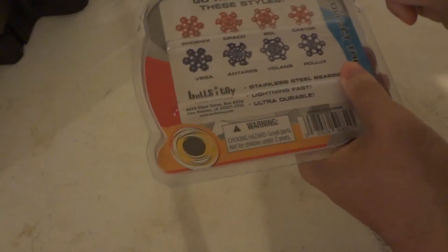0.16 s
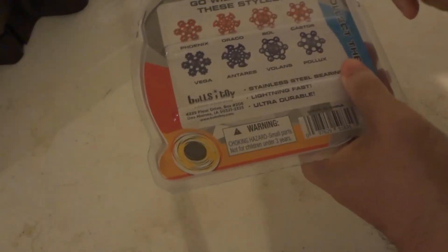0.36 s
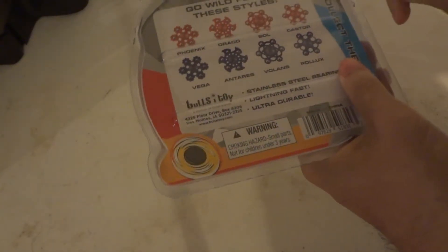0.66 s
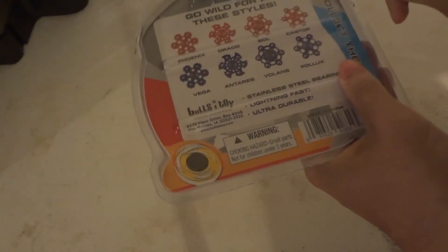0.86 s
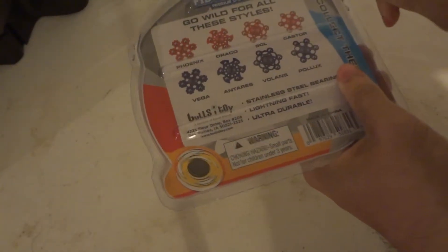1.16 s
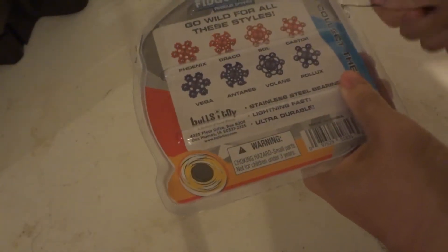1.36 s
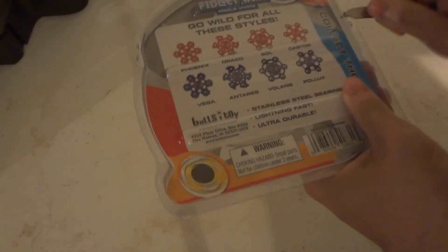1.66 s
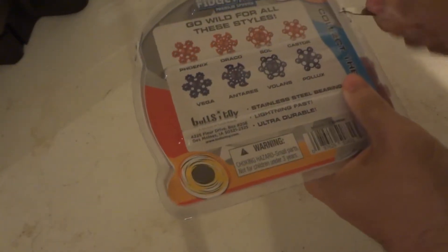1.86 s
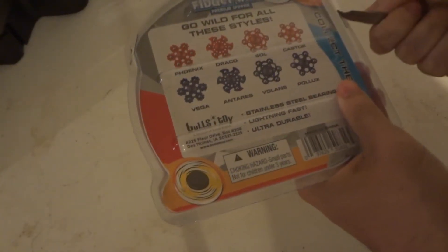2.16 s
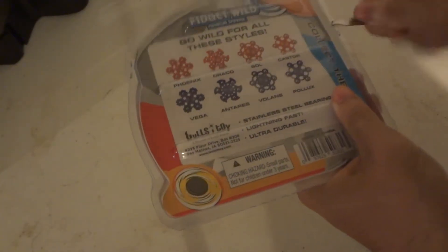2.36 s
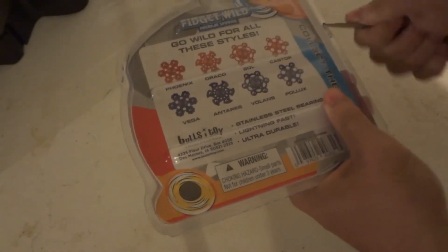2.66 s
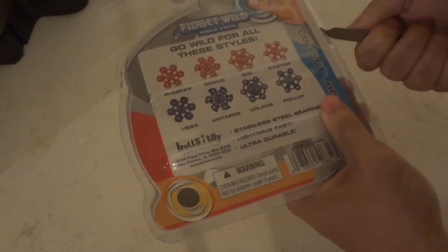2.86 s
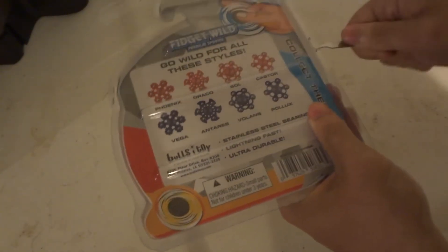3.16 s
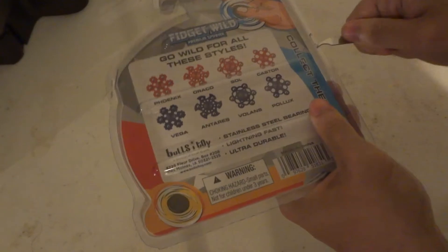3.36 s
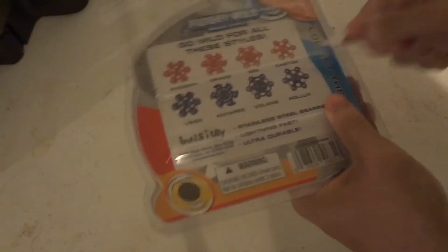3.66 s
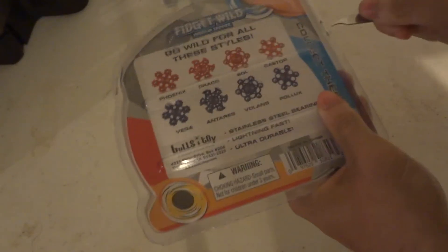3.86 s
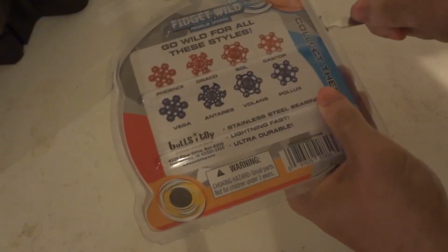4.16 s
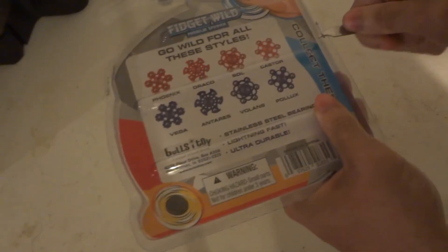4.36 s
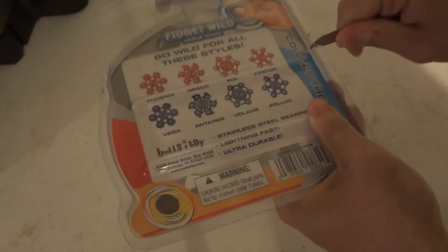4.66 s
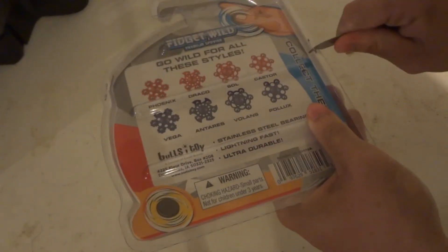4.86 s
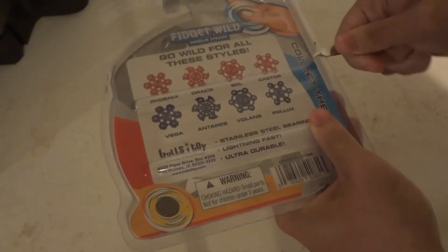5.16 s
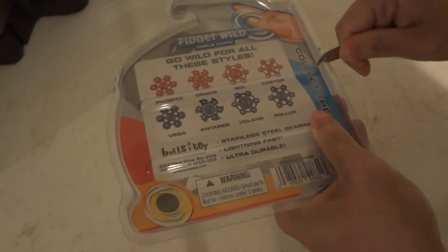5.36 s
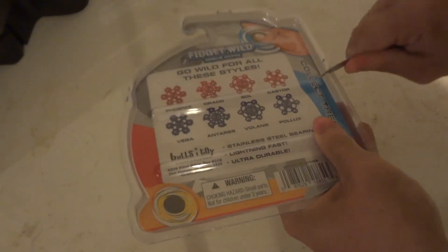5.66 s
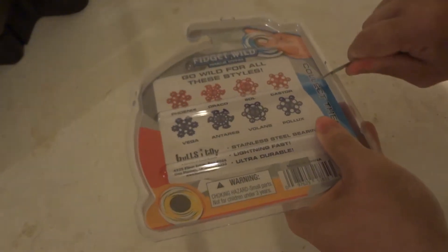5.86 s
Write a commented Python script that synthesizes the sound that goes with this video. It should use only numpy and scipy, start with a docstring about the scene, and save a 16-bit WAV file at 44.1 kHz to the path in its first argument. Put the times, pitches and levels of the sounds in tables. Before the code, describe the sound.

Close up in a quiet, hissy room, a small metal tip slips and ticks faintly against a plastic and card pack. A hard pry crackles and ends in the loudest snap at about 1.6 seconds. More snaps come in groups until 3.6, then softer clicks, a firm crack near 4.9 and a last bright snap just before the end.

```python
"""A small metal tool pries staples out of a plastic blister pack held close to a stereo microphone.
Faint slips of the tip come first; hard pries crackle near 1.6 s, and the loudest snap follows at 1.64 s.
More snaps come in groups up to 3.6 s, softer ones after 3.9 s, firm ones at 4.95 s and a last one at 5.9 s.
Slips are clicks and pries dense grains, both ringing the modes of card, plastic and metal.
Throughout, a quiet room hums and hisses as filtered noise, and the top of the hiss swells in patches."""
import sys
import numpy as np
from scipy import signal
from scipy.fft import rfft, irfft, next_fast_len
from scipy.io import wavfile

SR = 44100
rng = np.random.default_rng(int(sys.argv[2]) if len(sys.argv) > 2 else 0)


def bounce(signal):
    """Save signal as a 16-bit WAV file at the path given by the first command-line argument."""
    frames = np.transpose(np.atleast_2d(signal))
    limited = np.clip(frames, -1, 1)
    pcm = np.round(limited * 32767).astype(np.int16)
    wavfile.write(sys.argv[1], SR, pcm)


N = 265480

# Slips of the tip. Each row: start in seconds, shell push in dB, hollow and staple pushes in dB against
# the shell, drag time in milliseconds, pitch of the spot struck in Hz.
SLIPS = [(.1525, -62.5, 12, 13, 1.05, 1550), (0.1925, -54, 0, 6.5, 0.78, 1270),
         (0.3912, -59, 2, 11, 0.94, 1290), (.8, -57, 5, 4, 1.4, 5400), (1.059, -56.5, 9, 7, 1.1, 2260),
         (1.115, -52, 3.5, 9.5, 1.98, 1090), (1.18, -65.5, 3, 13, 1, 6170), (1.19, -51, 5.5, 10, 2.1, 1140),
         (1.2258, -59.5, -5, 9, 3.1, 4180), (1.2519, -62, 9, 7.5, 3.6, 7050),
         (1.283, -66.5, -3, 14, 1.9, 5970), (1.343, -71, -3, 13, 2.5, 5500),
         (1.4062, -62, 11, 10.5, 2.5, 4960), (1.4397, -64, 5, 12, 0.98, 5030),
         (1.469, -50.5, 1, 7.5, 1.55, 1230), (1.531, -55, -18, 7.5, .6, 3230),
         (1.571, -49.5, -3, 5, 7.7, 1380), (1.6003, -43, 1, 11.5, 6.9, 2230),
         (1.617, -37.5, -0.5, 1, 5.0, 1420), (1.6244, -31, 1, 3, 2.53, 2100),
         (1.641, -23, 6.5, 6.5, 0.77, 2544), (1.9948, -53.5, -6.5, 0, 5.2, 1260),
         (2.021, -59, -6.5, 7, 3.8, 2160), (2.048, -56.5, -2, 7, 4.4, 2800),
         (2.0903, -58, -11.5, 12.5, 1.1, 3350), (2.2776, -46.5, 0, 0, 1.36, 1400),
         (2.2997, -48.5, 2, 7, 8.8, 1340), (2.3159, -44.5, 8, 6, 2.9, 1430),
         (2.3347, -26, 0.5, 7, 1.28, 1280), (2.4256, -43, 7, 11, 2.5, 2630),
         (2.5585, -51, 15, 5, 1.14, 1423), (2.578, -56, -7, 7, 2.8, 2090),
         (2.616, -58.5, -5, -2, 2.2, 2580), (2.7022, -51, -3, 5, 1.6, 1180),
         (2.756, -67, 17, 4, 0.89, 1600), (2.7987, -33.5, 10, 6.5, 0.59, 1390),
         (2.8055, -37.5, -6, -8, 3.06, 2450), (3.0, -64, -6.5, 15.5, .9, 6060),
         (3.0386, -35.5, -1, 16, 0.96, 5150), (3.0408, -27, 0.5, 3.5, 3.52, 4450),
         (3.115, -37, 0, 1, 4.0, 4790), (3.3273, -61.5, 11, -5, 8.1, 960), (3.4917, -35, 5, 4, 2.24, 1280),
         (3.5003, -25.5, -1, 3, 1.27, 1270), (3.512, -34.5, 8, 13.5, 3.5, 3020),
         (3.5229, -37, 0, 10.5, 1.2, 1290), (3.5765, -38, -12, 9, 4.5, 3200),
         (3.5852, -31.5, 9, 7.5, 0.77, 1490), (3.597, -41, 14, -11, 3.3, 1010),
         (3.644, -42.5, 1.5, -6, 5.0, 1200), (3.9241, -53, 12.5, 10, 3.06, 1224),
         (4.182, -55.5, 0, -4, 6.4, 1600), (4.2224, -58, 13.5, 10.5, 1.52, 1300),
         (4.2365, -61.5, 8.5, 12, 3.6, 1280), (4.2851, -50.5, 8.5, 14, 0.7, 1330),
         (4.3039, -56, 13, 11, 3.65, 1290), (4.314, -43.5, 2.5, 6.5, 2.1, 1260),
         (4.4323, -42.5, 9.5, 14, 1.42, 1310), (4.9426, -45, 1, 13, 0.49, 4930),
         (4.9467, -30.5, 7.5, 12.5, 2.12, 2080), (4.965, -32.5, 6, -1, 2.43, 2080),
         (5.016, -50.5, 2, 8, 3.0, 1230), (5.0834, -41.5, 4.5, 7.5, 1.45, 1280),
         (5.229, -34.5, 3.5, 6.5, 2.19, 2890), (5.258, -39.5, 8, -16, 0.51, 2850),
         (5.309, -59, -3, 2, 2.5, 2200), (5.4136, -66.5, 5.5, 19.5, 0.51, 5400),
         (5.925, -30, 3, 8, 1.46, 4900)]
# Resonances of card, hollow blister, plastic shell, staple and tool.
# Each row: frequency in Hz, bandwidth in Hz, relative level in dB.
CARD_MODES = [(321, 170, -9), (388, 31, -6.5), (442.4, 48, -3), (576, 114, -3.5)]
HOLLOW_MODES = [(988, 154, -16.5), (1230, 400, -7), (1288, 186, 0.5), (1488, 336, -2), (1768, 330, 0)]
SHELL_MODES = [(1847, 170, -5), (2250, 144, -0.5), (2750, 322, 5), (3034, 77, -7), (3390, 210, -2)]
STAPLE_MODES = [(3993, 515, 0.5), (4840, 570, -1.4), (5490, 900, 2.2), (5940, 810, 0)]
TOOL_MODES = [(6720, 530, -0.5), (8020, 1380, 5.3), (8800, 390, -2), (10470, 1210, 4.5)]
SLIP_CARD_DB = -17.5   # card thump of a slip, against the shell
# tool edge against the staple: stronger on stiff, high spots
TOOL_DB, TOOL_DB_PER_OCTAVE, MID_SPOT_HZ = -4.5, 5, 2570
CHATTER_CLICKS = 30   # per slip


def slips():
    """Stick-slip excitation: a click and a fading chatter, which takes more of the energy in a longer drag."""
    start_s, shell_db, hollow_db, staple_db, drag_ms, spot_hz = np.transpose(SLIPS)
    tool_db = staple_db + TOOL_DB + TOOL_DB_PER_OCTAVE * np.log2(spot_hz / MID_SPOT_HZ)
    at = (start_s * SR).astype(int)
    drag_s = drag_ms[:, None] / 1000

    # exponential waits make the chatter thin out after the click
    wait_s = 1.3 * drag_s * rng.exponential(1, (len(at), CHATTER_CLICKS))
    later = np.minimum(at[:, None] + (wait_s * SR).astype(int), N - 1)
    chatter_share = np.clip(0.07 + (drag_s / 0.0048) ** 2, 0, .97)   # of the energy
    chatter_height = np.sqrt(chatter_share / CHATTER_CLICKS)
    click_height = np.sqrt(1 - chatter_share[:, 0])
    direction = rng.choice([-1, 1], len(at))   # the shell is pushed in or springs out

    def strike(part_db, mode_hz):
        # modes near the pitch of the spot that was struck get the larger push
        octaves_off = np.log2(mode_hz / spot_hz)
        near_db = 10.46 * np.exp(-(octaves_off / 0.2) ** 2)
        uneven_db = rng.normal(0, 1.63, len(at))
        size = amp(shell_db + part_db + near_db + uneven_db)
        clicks = np.zeros(N)
        np.add.at(clicks, later, chatter_height * rng.normal(0, 1, later.shape) * size[:, None])
        clicks[at] += size * click_height * direction
        return clicks

    card = body(lambda hz: strike(SLIP_CARD_DB, hz), CARD_MODES)
    hollow = body(lambda hz: strike(hollow_db, hz), HOLLOW_MODES)
    shell = body(lambda hz: strike(0, hz), SHELL_MODES)
    staple = body(lambda hz: strike(staple_db, hz), STAPLE_MODES)
    tool = body(lambda hz: strike(tool_db, hz), TOOL_MODES)
    return card + hollow + shell + staple + tool


# Hard pries that make the plastic crackle. Each row: peak in seconds, drive in dB, rise in milliseconds,
# hold in milliseconds, hollow and metal drives in dB against the shell.
PRIES = [(0.805, -74.5, 24, 4.5, -2, 5.5), (1.627, -61.5, 29, 17, 8.5, 9), (2.335, -56, 1.7, 1.5, -16, -5),
         (2.431, -67.5, 1.4, 1.5, -1, -13), (2.801, -65.5, 1.2, 1.5, 0, 1),
         (3.038, -59.5, 2.2, 120, -1, 6.5), (3.497, -63, 18, 27, 6.5, 2), (3.586, -63.5, 130, 1.4, 5, -3.5),
         (3.645, -69.5, 39, 4, 6, 8), (4.19, -84.5, 55, 4.6, -6, 8), (4.947, -61.5, 4, 20, 4.5, 5.5),
         (5.233, -69.5, 1.5, 1.5, 1, -1), (5.259, -74.5, 8, 1.5, 2.5, -0.5),
         (5.924, -64.5, 1.6, 55, -2.5, 6.5)]
# Flexes of the card in the hand. Each row: peak in seconds, drive in dB, rise and hold in milliseconds.
FLEXES = [(1.603, -64, 7.5, 8.8), (1.624, -54.5, 9.1, 12), (2.445, -72.5, 19, 38), (2.799, -63.5, 1.7, 2.8),
          (3.043, -69.5, 1.5, 70), (3.33, -79, 7.1, 5.4), (3.501, -60.5, 9.9, 41), (3.56, -61.5, 25, 19),
          (4.183, -72, 33, 5.9), (4.224, -74, 8, 28), (4.308, -65, 18, 5.1), (4.432, -65.5, 1.7, 2.7),
          (4.946, -58, 3.4, 21), (5.083, -72, 1.7, 2.5), (5.23, -66.5, 1.5, 3.7)]


def crackle(per_s):
    """Crackling noise: random micro-slips under strain or bending drive the same resonant bodies."""
    shell, hollow, metal = sum(effort(*row[:4]) * amp([[0], [row[4]], [row[5]]]) for row in PRIES)
    card = sum(effort(*row) for row in FLEXES)
    happens = rng.random(N) < per_s / SR
    grain_db = 3.6 * np.minimum(rng.exponential(1, N), 4)
    grains = rms_one(happens * amp(grain_db))

    def strike(gain):
        return gain * grains * rng.standard_normal(N)

    card_sound = body(lambda hz: strike(card), CARD_MODES)
    hollow_sound = body(lambda hz: strike(hollow), HOLLOW_MODES)
    shell_sound = body(lambda hz: strike(shell), SHELL_MODES)
    metal_sound = body(lambda hz: strike(metal), STAPLE_MODES + TOOL_MODES)
    return card_sound + hollow_sound + shell_sound + metal_sound


RISE_DB, SAG_DB_PER_S, RELEASE_DB_PER_S = 32, 160, 796   # shape of every pry and flex


def effort(peak_s, db, rise_ms, hold_ms):
    """Loading and release: gain rises to its peak, sags while the force holds, then lets go fast."""
    t = np.arange(N) / SR - peak_s
    hold_s = hold_ms / 1000
    rising = RISE_DB * t / (rise_ms / 1000)
    sag = SAG_DB_PER_S * np.minimum(t, hold_s)
    release = RELEASE_DB_PER_S * np.maximum(t - hold_s, 0)
    shape_db = np.where(t < 0, rising, -sag - release)
    return amp(db + np.maximum(shape_db, -200))


def body(strike, modes):
    """Modal superposition: alternating signs, a push for each mode, little radiated outside them."""
    rung = np.zeros(N)
    for k, (hz, width_hz, db) in enumerate(modes):
        rung += (-1) ** k * amp(db) * resonate(strike(hz), hz, width_hz)
    edges_hz = [0.76 * modes[0][0], 1.76 * modes[-1][0]]
    return signal.sosfilt(signal.butter(3, edges_hz, "band", fs=SR, output="sos"), rung)


def resonate(x, hz, width_hz):
    """Damped two-pole resonance: a unit click sets a decaying sine of height about 1 ringing."""
    r = np.exp(-np.pi * width_hz / SR)
    w = 2 * np.pi * hz / SR
    return signal.lfilter([0, np.sin(w)], [1, -2 * r * np.cos(w), r * r], x + 1e-18)


BOUNCE_MS, BOUNCE_DB = 8.0, -16.5


def first_bounce(x):
    """Specular reflection: one delayed, weaker copy off a hard surface close by."""
    lag = int(BOUNCE_MS / 1000 * SR)
    return amp(BOUNCE_DB) * np.pad(x, (lag, 0))[:N]


ECHO_T60_S, ECHO_DB = 0.18, -21.5


def echoes(x):
    """Recirculating reflections: eight feedback delays a side from the hard surfaces nearby."""
    size = next_fast_len(N + SR // 2)
    w = np.linspace(0, np.pi, size // 2 + 1)
    response = np.zeros((2, size // 2 + 1), complex)
    lags = (rng.uniform(.005, 0.021, 16) * SR).astype(int)
    for k, lag in enumerate(lags):
        loop = amp(-60 * lag / SR / ECHO_T60_S) * np.exp(-1j * w * lag)
        response[k % 2] += loop / (1 - loop) * (-1) ** (k // 2)   # sum of all repeats
    return irfft(response * rfft(x, size), size)[:, :N]


# Spectrum of the hiss. Each row: frequency in Hz, relative density in dB per Hz.
ROOM_SPECTRUM = [(15, -53), (25, -18.5), (101, -8), (173, -10.5), (303, -1.5), (685, -3.5), (979, -1.5),
                 (1400, -4.5), (2210, -7), (2930, -11.5), (5260, -15), (6120, -15.5), (11000, -18),
                 (14300, -35), (22000, -120)]
# Level of the hiss over time. Each row: time in seconds, level in dB.
ROOM_LEVEL = [(0.0, -57.5), (.82, -59), (1.68, -56.5), (1.9, -58), (3.79, -57), (3.96, -59), (5.15, -58),
              (5.6, -59), (6.02, -57)]
# Correlation of the two channels. Each row: frequency in Hz, left-right likeness from -1 to 1.
LIKENESS = [(60, 0.96), (140, 0.77), (350, 0.21), (840, -0.43), (2010, -0.26), (4840, 0.33), (11700, 0.72)]
HUM_HZ, HUM_DB = 121, -80


def room_tone():
    """Partly coherent noise: stereo hiss most alike in the bass and the top, over a wavering mains hum."""
    hz = np.maximum(np.fft.rfftfreq(N, 1 / SR), 1)
    alike = np.clip(at_hz(LIKENESS, hz), -1, 1)
    mid, side = rfft(rng.standard_normal((2, N))) * amp(at_hz(ROOM_SPECTRUM, hz))
    hiss = irfft(np.sqrt(1 + alike) * mid + np.sqrt(1 - alike) * side * [[1], [-1]], N)
    t = np.arange(N) / SR
    level_s, level_db = np.transpose(ROOM_LEVEL)
    hiss = amp(np.interp(t, level_s, level_db)) * rms_one(hiss)

    hum = np.sqrt(2) * np.sin(2 * np.pi * HUM_HZ * t)
    hum += 0.12 * rms_one(resonate(rng.standard_normal(N), HUM_HZ, 16.0))   # narrow noise: the waver
    return hiss + amp(HUM_DB) * hum


# Swells at the top of the hiss. Each row: start in seconds, length in seconds, level in dB.
TREBLE_SWELLS = [(.072, 0.093, -62), (0.468, 0.11, -63), (0.632, 0.13, -65.5), (0.828, .11, -64.5),
                 (1.033, 0.23, -66), (1.32, 0.18, -63.5), (1.68, 0.076, -61.5), (1.996, 0.13, -62),
                 (2.155, .14, -63), (2.345, .165, -62), (2.593, 0.13, -65.5), (2.72, .25, -65),
                 (3.137, 0.18, -61.5), (3.65, 0.18, -64.5), (4.15, 0.13, -64.5), (4.49, 0.18, -64.5),
                 (4.717, 0.44, -64.5), (5.124, 0.12, -62.5), (5.365, 0.1, -64.5), (5.635, 0.16, -65)]
# Bands that swell. Each row: frequency in Hz, bandwidth in Hz, relative level in dB.
TREBLE_BANDS = [(9780, 280, 2.5), (10130, 200, -3), (10530, 270, 0)]
TREBLE_LOW_HZ = 9100


def treble_patches():
    """Amplitude-modulated band noise: mostly centred bursts, quick to start and slower to fade."""
    white = rng.standard_normal(N) + 0.56 * rng.standard_normal((2, N))   # shared, then one per side
    bands = np.zeros((2, N))
    for hz, width_hz, db in TREBLE_BANDS:
        bands += amp(db) * resonate(white, hz, width_hz) * np.sqrt(width_hz)
    high_pass = signal.butter(6, TREBLE_LOW_HZ, "high", fs=SR, output="sos")
    noise = rms_one(signal.sosfilt(high_pass, bands))
    swell = np.zeros(N)
    for start_s, length_s, db in TREBLE_SWELLS:
        a, b = int(start_s * SR), int((start_s + length_s) * SR)
        shape = np.interp(np.linspace(0, 1, b - a), [0, .12, .7, 1], [0.51, 0.79, 0.72, 0.24])
        swell[a:b] += amp(db) * shape
    return swell * noise


def amp(db):
    """Decibel law: level in dB to amplitude ratio."""
    return 10 ** (np.asarray(db) / 20)


def rms_one(x):
    """Power normalisation: scale to a root mean square of one."""
    return x / np.sqrt(np.mean(x ** 2) + 1e-20)


def at_hz(points, hz):
    """Logarithmic frequency scale: table values joined by straight lines over log frequency."""
    point_hz, value = np.transpose(points)
    return np.interp(np.log(hz), np.log(point_hz), value)


def scene():
    """Superposition: a near, centred pack, one early bounce, partly centred echoes and the room."""
    pack = slips() + crackle(per_s=5500)
    near = (pack + first_bounce(pack)) * amp([[.2], [-.2]])
    echo = echoes(pack)
    echo = echo + 0.16 * echo[::-1]   # some of each side leaks into the other
    return near + amp(ECHO_DB) * echo + room_tone() + treble_patches()


MIC_TOP_HZ, CUTOFF_HZ = 11022, 12269


def record(dry):
    """Band limiting: the microphone path falls away at the top, then a steeper low-pass cuts the band."""
    mic = signal.ellip(8, .8, 31, MIC_TOP_HZ, fs=SR, output="sos")
    band_cut = signal.ellip(10, .5, 60, CUTOFF_HZ, fs=SR, output="sos")
    return signal.sosfilt(band_cut, signal.sosfilt(mic, dry))


dry = scene()
out = record(dry)
bounce(out)
```